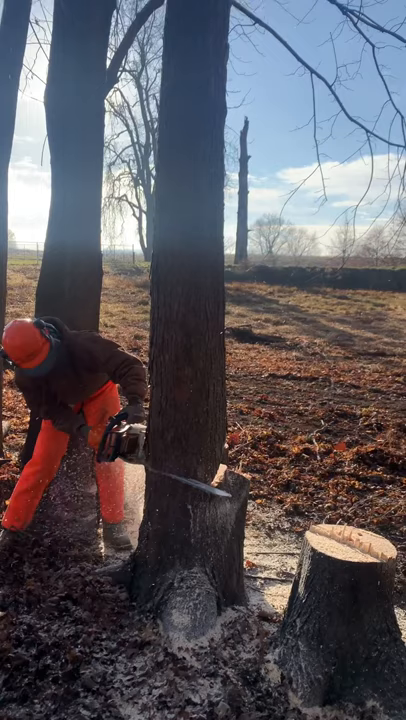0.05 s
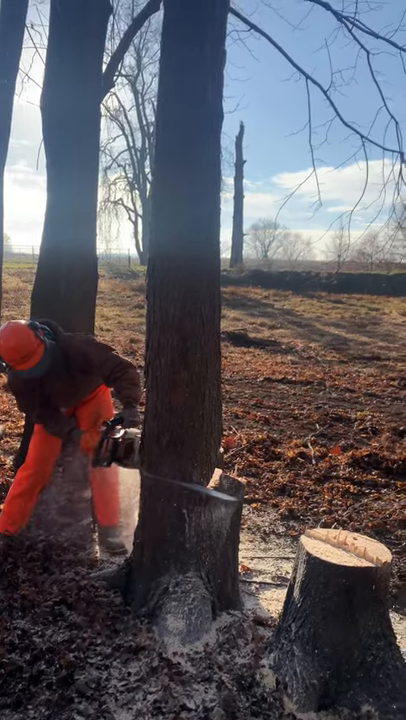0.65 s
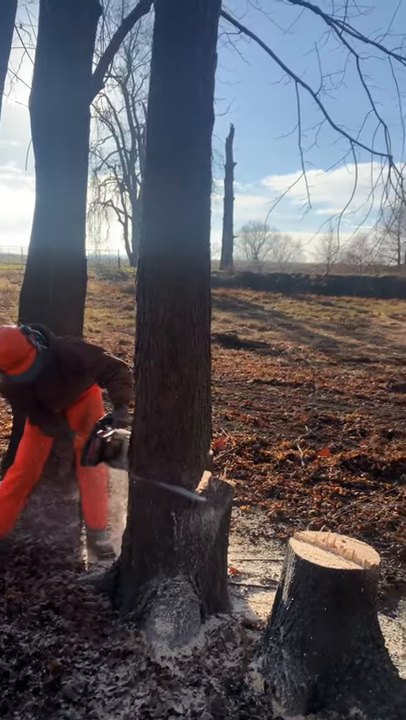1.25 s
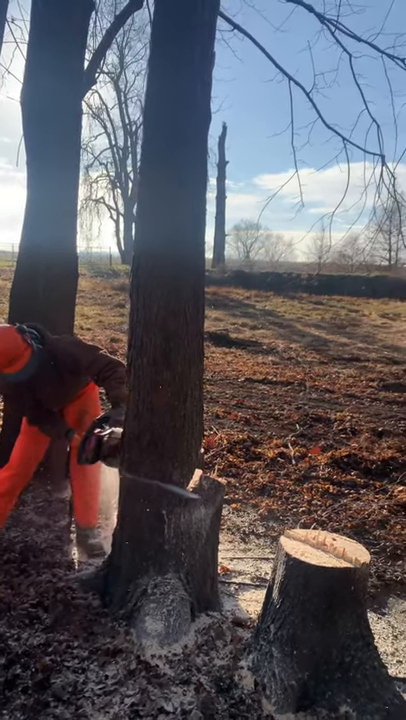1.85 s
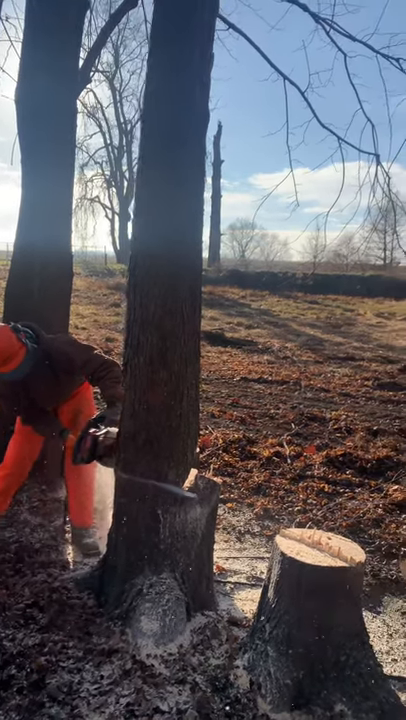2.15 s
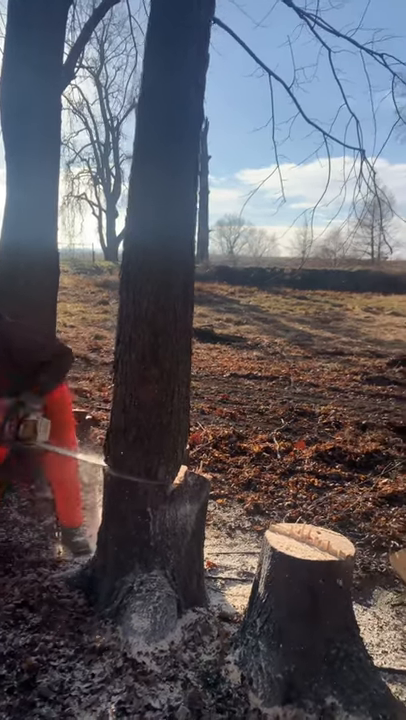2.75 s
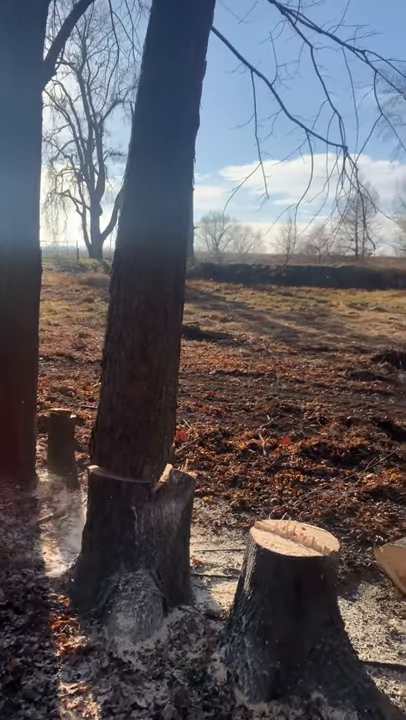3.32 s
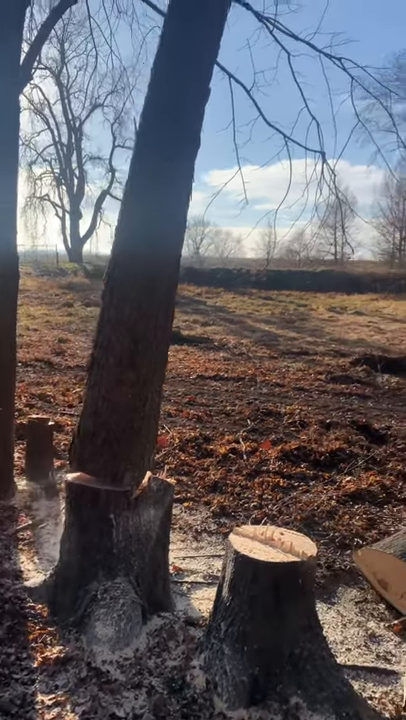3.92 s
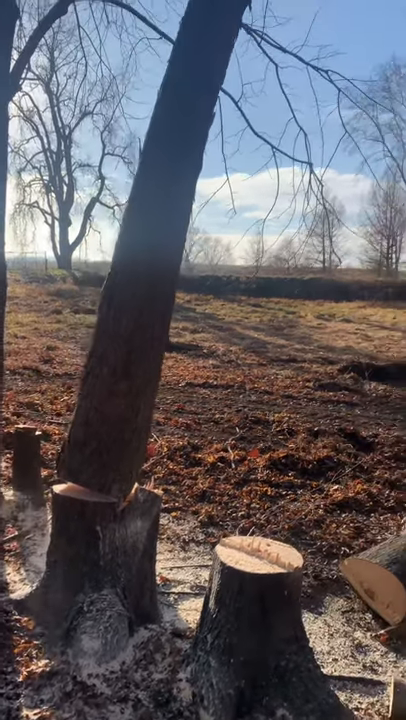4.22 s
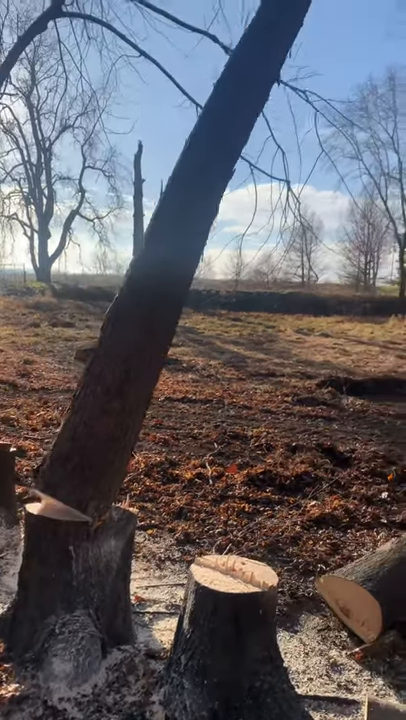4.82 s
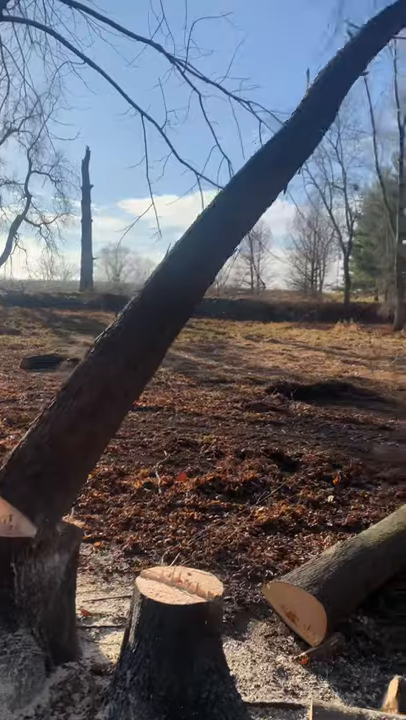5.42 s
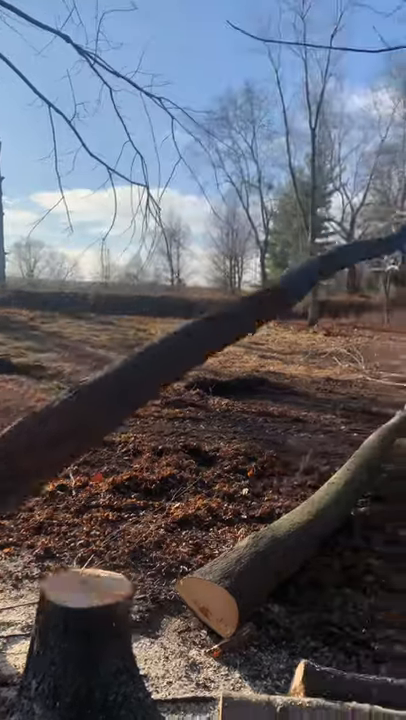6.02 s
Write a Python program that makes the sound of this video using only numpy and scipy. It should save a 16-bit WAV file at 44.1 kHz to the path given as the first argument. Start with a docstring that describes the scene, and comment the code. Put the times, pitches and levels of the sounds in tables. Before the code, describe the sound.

A chainsaw revs hard through a trunk outdoors, winds down to an uneven idle and moves off as wood fibres snap.

```python
"""A two-stroke chainsaw, close by, finishes a felling cut: full throttle, a short release, a second burst.
Each firing barks through the muffler and rings its shell while the chain hisses and whirrs on the bar.
The saw coasts down to a stumbling idle and is carried off as the tree tips and its hinge fibres snap.
Open field with a faint answer from the trees, heard near the stump by two close-set microphone ports."""
import sys
import numpy as np
from scipy import signal
from scipy.fft import rfft, irfft, next_fast_len
from scipy.io import wavfile
from scipy.ndimage import uniform_filter1d

SR = 44100
rng = np.random.default_rng(int(sys.argv[2]) if len(sys.argv) > 2 else 0)


def wav_record(signal):
    """Record a signal, one row per channel, as 16-bit PCM in the file named by sys.argv[1]."""
    frames = np.transpose(np.atleast_2d(signal))
    bounded = np.clip(frames, -1, 1)
    # unit amplitude maps onto the largest positive 16-bit level
    quanta = np.round(bounded * 32767).astype(np.int16)
    wavfile.write(sys.argv[1], SR, quanta)


N = 267687
TIME = np.arange(N) / SR

# Engine speed with the chain in the wood. Each row: time in seconds, turns a second.
FIRST_CUT_SPEED = [(.02, 148), (.21, 141.8), (.4, 145), (.5, 141.6), (.74, 141.4), (.82, 139.6)]
LAST_CUT_SPEED = [(1.34, 200.9), (1.648, 196.8), (1.708, 203.5), (1.826, 207.8), (2.082, 197.1),
                  (2.13, 188.2), (2.226, 193.9), (2.258, 192.9), (2.35, 182.6)]
# Throttle releases; wood brakes the chain harder than air does.
# Each row: start in seconds, time constant of the slowing in seconds.
THROTTLE_RELEASES = [(.82, 0.165), (2.35, .416)]
# The throttle between the cuts. Each row: time in seconds, share of a full charge.
THROTTLE_CHARGE = [(.826, 0.94), (.834, 0.29), (.93, 0.17), (.965, 0.69), (1.04, 0.99), (1.1, 0.93)]
# Ignition; off load the engine skips turns. Each row: start and end in seconds, turns per firing.
IGNITION_SPELLS = [(0, 1.921, 1), (1.926, 1.99, 1), (1.995, 2.064, 1), (2.064, 2.127, 3), (2.127, 2.261, 1),
                   (2.261, 2.305, 3), (2.305, 2.366, 4)]
# The stumbling idle. Each row: time of a firing in seconds, level at the stump in dB.
IDLE_FIRINGS = [(3.017, -29.5), (3.05, -27.5), (3.068, -23), (3.124, -22.5), (3.178, -24), (3.216, -22),
                (3.288, -20.5), (3.343, -26.5), (3.361, -21), (3.441, -24), (3.482, -26.5), (3.525, -21.5),
                (3.592, -20), (3.68, -20.5), (3.748, -23), (3.817, -20), (3.925, -21.5), (4.014, -20.5),
                (4.104, -21), (4.174, -19.5), (4.267, -17.5), (4.394, -20.5), (4.487, -20.5), (4.578, -24),
                (4.734, -20.5), (4.847, -22.5), (5.182, -24.5), (5.303, -20.5), (5.372, -24.5),
                (5.394, -24.5), (5.485, -23.5), (5.585, -24.5), (5.63, -24.5), (5.699, -22), (5.804, -22),
                (5.872, -24.5), (5.918, -24.5), (5.965, -23.5), (6.034, -19.5)]
# How far the swinging saw's outlet faces the microphone. Each row: time in seconds, gain in dB.
OUTLET_FACING = [(3.45, -6), (3.65, -23.5), (5.1, -24), (5.35, -10)]

# Tone colours of the exhaust. Each row: frequency in Hz, relative level in dB.
FIRED_MUFFLER = [(35, -76), (80, -2.5), (143, 1.5), (195, -10), (286, -3.5), (400, 4), (500, 5), (585, 13),
                 (715, 2.5), (830, 6.5), (990, 0.5), (1170, -4), (1330, -34), (1900, -34.5)]
UNFIRED_MUFFLER = [(40, -23), (90, 1.5), (160, 2.5), (220, 2.5), (360, 6), (480, 19), (620, 14),
                   (730, 15.5), (860, -4), (1300, -15), (2400, -41), (5000, -44)]
MUFFLER_SHELL = [(900, -3.5), (1400, 17.5), (1600, 5.5), (1790, 23.5), (1980, 13), (2350, 23), (2620, 23),
                 (2820, 8), (3020, 1.5), (3400, 20), (3650, 12), (4000, 14), (4400, -18), (4780, 6),
                 (5400, 9), (9000, -53)]
GAS_JET = [(100, -88), (600, -20), (1300, -15.5), (2400, -16.5), (4000, -20), (6000, -61)]
COAST_PUFF = [(60, -20), (180, -9), (290, 2), (420, 3.5), (560, 13), (700, -8), (850, -15), (1200, -27),
              (4000, -48)]
IDLE_BARK = [(120, -25), (260, -14), (340, -2), (530, -0.5), (620, -6.5), (790, -20), (1020, -15.5),
             (1450, -26.5), (6000, -33), (10000, -42.5)]
IDLE_PUFF = [(30, -4), (110, -22.5), (180, 5.5), (260, 5), (430, 9.5), (570, 5.5), (680, -14), (850, -27),
             (1200, -19), (5000, -32), (9000, -64)]
OUTLET_RING = [(450, -11.5), (700, 4), (880, 6.5), (1030, -2), (1230, -27), (1500, -29)]
BASS_THUMP = [(25, -78), (60, 9), (120, 12.5), (180, 11.5), (300, 2.5), (700, -48)]
SHARP_CLICK = [(300, -22), (1200, -3), (2200, 2), (3200, -2), (6000, -10), (12000, -4), (16000, -20)]
# Tone colours of the moving metal. Each row: frequency in Hz, relative level in dB.
CHAIN_HISS = [(3000, 0), (4600, 5), (5600, 2.5), (7200, 3), (8500, -3.5), (10000, 9), (12000, 8.5),
              (13500, 3.5), (15000, 3.5), (16000, -13)]
GUIDE_BAR = [(1400, 0), (2300, 3.5), (3200, 5), (3700, -1.5), (4300, -7)]
CLUTCH_CHATTER = [(1500, -36), (2000, -4.5), (2350, -3), (2800, -10), (6000, -26)]
PISTON_RATTLE = [(200, 10), (800, 11), (1500, -19.5), (2100, 0.5), (2650, -1), (3100, -3.5), (5500, -6.5),
                 (7000, -5.5), (8500, -7.5), (11000, -4), (16000, -27)]
# Whirr of the chain, driven and slack. Each row: multiple of the shaft speed, relative level in dB.
DRIVEN_WHIRR = [(14, -3), (16, 1), (17, -32), (21, 12), (23, 7.5)]
SLACK_WHIRR = [(14, -2), (15, 0), (16, -1), (22, -5)]
# Modes rung by links tapping the bar. Each row: frequency in Hz, level in dB, t60 in seconds.
LINK_MODES = [(2537, -45.5, 0.033), (2770, -48, 0.038), (3055, -45, 0.023), (4670, -55, 0.065)]

# Bundles of hinge fibres breaking. Each row: time in seconds, splinter level in dB, body level in dB.
HINGE_SNAPS = [(3.215, -38.5, -42), (3.455, -41, -56), (3.5475, -21, -20.5), (3.5526, -29.5, -31),
               (3.826, -21, -23.5), (3.9678, -34.5, -40.5), (4.0056, -39.5, -51), (4.0206, -38.5, -53),
               (4.055, -31.5, -36.5), (4.2247, -35, -46.5), (4.2983, -34, -36.5), (4.5297, -26, -25.5),
               (4.539, -36.0, -40), (4.5477, -30.5, -36), (4.603, -27, -35), (4.618, -36, -50),
               (4.6586, -35.5, -49), (4.8052, -33.5, -32.5), (4.816, -21, -19.5), (4.9038, -38, -46.5),
               (4.9714, -27, -26), (5.0017, -30.5, -30.5), (5.0615, -34, -40.5), (5.2147, -29.5, -28.5),
               (5.231, -35, -38), (5.263, -29, -34.5), (5.27, -28, -27.5), (5.278, -28, -27),
               (5.2799, -29.5, -42)]
# Tone colours of the breaking wood. Each row: frequency in Hz, relative level in dB.
SPLINTER_TREBLE = [(1500, -30), (5500, 0), (10500, 0), (13500, -5), (16000, -11)]
TRUNK_BODY = [(40, -45), (250, -13), (900, -4), (1800, 1), (3000, -4), (4300, -5), (6000, -16),
              (12000, -35)]

# The answer of ground and trees. Each row: frequency in Hz, t60 in seconds.
FIELD_DECAY = [(150, 0.3), (1500, 0.99), (5000, 0.071), (14000, 0.0039)]
# Hush of the open air. Each row: frequency in Hz, relative level in dB.
OPEN_AIR = [(20, -71), (70, -24), (400, -9), (1500, -25), (6000, -31), (16000, -49)]
# Left microphone port against right. Each row: frequency in Hz, phase difference in radians.
MIC_PHASE = [(0, 0), (750, -.6), (2670, -.3), (4650, -.8), (5250, -2.6), (6720, -.9), (8400, -3.1),
             (10700, -6.2), (13500, -9.4), (15200, -12.4)]
# The same two ports. Each row: frequency in Hz, level difference in dB.
MIC_BALANCE = [(160, -2.3), (400, 0), (740, -2.8), (2010, -.5), (5000, -3), (9000, 0)]

FULL_HZ, COAST_TO_HZ = 200, 25.15  # turns a second: flat out, and what a coasting engine sinks towards
REOPEN_S, PICKUP_S, RUN_UP_S = 0.94, .045, 0.34  # the throttle reopens, the engine hesitates, runs up
# Loudness follows speed. Each pair: gain in dB at full speed, dB per doubling of speed.
FIRED_LAW, UNFIRED_LAW = (-9.5, 2.3), (-17.5, 8.6)
RASP_LAW, RASP_COAST_LAW = (-26, 12), (-33, 8.9)
CHAIN_LAW, CHAIN_COAST_LAW = (-34, 2.7), (-38, 10.1)
IDLE_FROM_S, CATCH_HZ, IDLE_HZ, SETTLE_S = 3.12, 55, 43.84, .5  # the idle catches, then settles


def revving_saw():
    """The saw at the trunk, close up: one stroke a turn, fired or skipped, until the idle takes over."""
    rate = engine_speed()
    turns = np.cumsum(rate) / SR
    times = np.interp(np.arange(turns[-1]), turns, TIME)
    fired = np.zeros(len(times), bool)
    for start, end, every in IGNITION_SPELLS:
        spell = np.flatnonzero((times >= start) & (times < end))
        fired[spell[int(every) // 2::int(every)]] = True
    drift, size_scatter, edge_scatter = rng.standard_normal((len(times), 3)).T
    times = times + signal.lfilter([4e-6], [1, -.97], drift)  # the flywheel lets the timing only drift
    sizes = amp(.3 * size_scatter)
    edges = amp(.7 * edge_scatter - 11 * ~fired)  # the sharp opening of the exhaust port
    charge = fired * np.clip(curve(THROTTLE_CHARGE, times), 0, 1)
    load = np.interp(TIME, times, np.sqrt(signal.lfilter(np.ones(4) / 4, 1, charge ** 3)))
    gas = exhaust(times, sizes, fired, charge, rate) + coasting_puffs(times, sizes)
    treble = rasp(times, edges, load, rate, turns) + chain_hiss(times, edges, load, rate)
    fade = np.interp(TIME, [2.99, 3.04], [1, 0])
    return fade * (gas + treble) + clutch(times) + pops(times, fired)


def engine_speed():
    """Turns a second: set by the wood in each cut, sinking after a release, running up between cuts."""
    def coast(cut, at, start, tau):
        return COAST_TO_HZ + (curve(cut, TIME) - COAST_TO_HZ) * np.exp(-np.maximum(at - start, 0) / tau)
    first = coast(FIRST_CUT_SPEED, np.minimum(TIME, REOPEN_S), *THROTTLE_RELEASES[0])
    last = coast(LAST_CUT_SPEED, TIME, *THROTTLE_RELEASES[1])
    return last + (first - last) * np.clip(1 - (TIME - REOPEN_S - PICKUP_S) / RUN_UP_S, 0, 1) ** 2


def loudness(law, rate):
    """Gain at a given engine speed."""
    return amp(law[0] + law[1] * np.log2(rate / FULL_HZ))


def exhaust(times, sizes, fired, charge, rate, warm_up_s=0.31, heat_rise=0.061):
    """Fired charges bark, skipped turns pump softly; hotter gas lifts the bark in the second burst."""
    def strokes(law, share):
        return pulses(times, sizes * share * loudness(law, np.interp(times, TIME, rate)))
    heat = np.clip((times - REOPEN_S) / warm_up_s, 0, 1) ** 2
    hot_muffler = [(hz * (1 + heat_rise), db) for hz, db in FIRED_MUFFLER]
    bark = ring(strokes(FIRED_LAW, charge * (1 - heat)), FIRED_MUFFLER)
    bark += ring(strokes(FIRED_LAW, charge * heat), hot_muffler)
    churn = amp(-24) * loudness(UNFIRED_LAW, rate) * bursts(times, 1. * ~fired, t60=0.0092)
    pumping = ring(strokes(UNFIRED_LAW, 1 - charge) + churn, UNFIRED_MUFFLER)
    return baffle(bark + pumping)


def coasting_puffs(times, sizes, from_s=2.37, cooled_s=2.95, heat_rise=0.45):
    """Unfired strokes puff hollowly, lower as the gas cools, and come back off the trunk."""
    cooled = np.clip((times - from_s) / (cooled_s - from_s), 0, 1)
    sizes = sizes * (times > from_s)
    hot_puff = [(hz * (1 + heat_rise), db) for hz, db in COAST_PUFF]
    gas = ring(pulses(times, sizes * (1 - cooled) * amp(-43)), hot_puff)
    gas += ring(pulses(times, sizes * cooled * amp(-34)), COAST_PUFF)
    return baffle(trunk_echo(gas, delay_s=0.00619, share=0.86))


def baffle(x, hz=560, width_hz=420):
    """The muffler chamber delays the frequencies near its resonance and spreads each pulse."""
    resonance = lambda f: hz ** 2 - f ** 2 + 1j * f * width_hz
    return filtered(x, lambda f: np.conj(resonance(f)) / resonance(f))


def rasp(times, edges, load, rate, turns):
    """Each port opening rings the muffler shell and tears into turbulence, with the chain's whirr on top."""
    shell = even(ring(pulses(times, edges), MUFFLER_SHELL))
    jet = even(ring(bursts(times, edges, t60=0.93), GAS_JET))
    # the chain sings only once it bites, not while the engine runs up
    biting = np.where(TIME < REOPEN_S, 1, np.clip((TIME - REOPEN_S) / RUN_UP_S, 0, 1) ** 3)
    driven = biting * chain_whirr(turns, rate, DRIVEN_WHIRR, waver_db=2.5, slip_rad=1.0)
    slack = chain_whirr(turns, rate, SLACK_WHIRR, waver_db=5.5, slip_rad=2.6)
    loaded = loudness(RASP_LAW, rate) * (amp(-1) * shell + amp(-12) * jet + amp(-9) * driven)
    coasting = loudness(RASP_COAST_LAW, rate) * (amp(-11) * shell + amp(-7) * jet + amp(-6) * slack)
    return load * loaded + (1 - load) * coasting


def chain_whirr(turns, rate, partials, waver_db, slip_rad):
    """Chain and sprocket sing unsteadily at multiples of the shaft speed and fade as it slows."""
    drift = lambda: np.interp(np.arange(N), np.linspace(0, N, 320), rng.standard_normal(320))
    tones = sum(amp(db + waver_db * drift()) * np.sin(2 * np.pi * round(k) * turns + slip_rad * drift())
                for k, db in partials)
    return coloured(unit(tones), GUIDE_BAR) * np.minimum(rate / 150, 1) ** 2


def chain_hiss(times, edges, load, rate):
    """The running chain hisses in step with the strokes, louder under load."""
    hiss = even(ring(bursts(times, np.sqrt(edges), t60=0.041), CHAIN_HISS))
    return hiss * (load * loudness(CHAIN_LAW, rate) + (1 - load) * loudness(CHAIN_COAST_LAW, rate))


def clutch(times, grab_s=0.46):
    """Once the throttle reopens, the clutch chatters each turn, fading as it grips."""
    slipping = times[times > REOPEN_S]
    sizes = amp(-37.5) * np.exp((REOPEN_S - slipping) / grab_s)
    return ring(bursts(slipping, sizes, t60=0.037), CLUTCH_CHATTER)


def pops(times, fired):
    """A click and a low gulp as the throttle reopens, and a crack from each firing after a skipped turn."""
    click = ring(bursts(np.array([REOPEN_S + .004]), amp([-25]), t60=0.008), SHARP_CLICK)
    gulp = ring(pulses(np.array([REOPEN_S + .006]), amp([-31])), BASS_THUMP)
    crack_s = times[fired & ~np.append(True, fired[:-1])]
    cracks = ring(bursts(crack_s, np.full(len(crack_s), amp(-34)), t60=0.07), SHARP_CLICK)
    return click + gulp + cracks


def idling_saw(recharge_db=3, full_burn_db=-23):
    """The idle fires only every few turns; in between it puffs harder as the cylinder recharges."""
    def blow(s, db):
        """Gas churns out as the port opens, so no two blows are alike."""
        return pulses(s, amp(db)) + amp(-25) * bursts(s - .0015, amp(db), t60=0.033)
    fire_s, near_db = np.transpose(IDLE_FIRINGS)
    fire_db = near_db + away_db(fire_s)
    gaps = np.diff(fire_s)
    rate = IDLE_HZ + (CATCH_HZ - IDLE_HZ) * np.exp(-(fire_s[:-1] - IDLE_FROM_S) / SETTLE_S)
    recharge = [np.arange(1, n) / n for n in np.maximum(np.round(gaps * rate), 1)]
    puff_s = np.concatenate([s + gap * share for s, gap, share in zip(fire_s, gaps, recharge)])
    puff_db = -30.5 + 0.85 * away_db(puff_s) + recharge_db * (np.concatenate(recharge) - .5)
    gas = baffle(ring(blow(fire_s, fire_db), IDLE_BARK) + ring(blow(puff_s, puff_db), IDLE_PUFF))
    aimed = blow(fire_s, fire_db + curve(OUTLET_FACING, fire_s))
    aimed += blow(puff_s, puff_db + curve(OUTLET_FACING, puff_s))
    # weak charges hardly thump; the bass bends round obstacles and holds up as the saw moves off
    thumps = pulses(fire_s, amp(-36 + 5.3 * np.minimum(near_db - full_burn_db, 0)))
    thumps += pulses(puff_s, np.full(len(puff_s), amp(-47)))
    gas += ring(aimed, OUTLET_RING) + ring(thumps, BASS_THUMP)
    gas = baffle(gas, hz=125, width_hz=49)  # the bass leaves the muffler last
    return trunk_echo(gas, delay_s=0.00563, share=0.14) + piston_rattle(fire_s, puff_s)


def piston_rattle(fire_s, puff_s, shade_hz=5000):
    """The piston rattles each idle turn, harder on a firing; the trunks shade its highest part most."""
    spit = ring(bursts(fire_s, amp(-49 + 0.24 * away_db(fire_s)), t60=0.11), PISTON_RATTLE)
    strokes = np.concatenate([fire_s, puff_s])
    rattle = even(ring(bursts(strokes, np.ones(len(strokes)), t60=0.085), PISTON_RATTLE))
    metal = spit + amp(-49) * rattle
    dull = filtered(metal, lambda hz: 1 / (1 + (hz / shade_hz) ** 2))
    shade = amp(shade_db(TIME))
    return shade * dull + shade ** 2.8 * (metal - dull)


def slack_links(count=240, slack_s=2.2):
    """Slack links tap the guide bar at random; each tap rings its modes in a different mix."""
    chance = rng.random((count, 1 + len(LINK_MODES)))
    tap_s = slack_s + (np.arange(count) + chance[:, 0]) / count * (N / SR - slack_s)
    sizes = amp(away_db(tap_s) + shade_db(tap_s))[:, None] * 2 * chance[:, 1:] ** 2
    t = np.arange(SR // 10) / SR
    modes = [amp(db - 60 * t / t60) * np.sin(2 * np.pi * hz * t) for hz, db, t60 in LINK_MODES]
    return sum(signal.fftconvolve(pulses(tap_s, size), mode)[:N] for size, mode in zip(sizes.T, modes))


def away_db(s):
    """Level lost as the saw is carried away from the microphone."""
    return np.interp(s, [4.68, 4.87], [0, -10])


def shade_db(s, from_s=5.25, db_per_s=16):
    """Treble lost as the saw goes behind the trunks."""
    return -db_per_s * np.maximum(s - from_s, 0)


def hinge_snaps(split_hz=2200, ring_db=4, ring_octaves=0.16):
    """Big bundles of fibres snap at the stump, each split piece with its own ring."""
    snaps, hz = np.zeros((2, N + SR)), np.geomspace(40, 16000, 70)
    for s, splinter_db, body_db in HINGE_SNAPS:
        ring_hz = split_hz * 2 ** rng.uniform(-0.32, 0.86)
        piece_db = along(TRUNK_BODY, hz) + ring_db * np.exp(-(np.log2(hz / ring_hz) / ring_octaves) ** 2)
        treble = fracture(SPLINTER_TREBLE, lead_db=-21, tear=(-18, 0.0052),
                          tail=(-30.5, 0.089), width=0.53)
        body = fracture(np.transpose([hz, piece_db]), lead_db=-15.5, tear=(-17, 0.0096),
                        tail=(-28.5, 0.084), width=0.92)
        start = round(s * SR) - SR // 100
        snaps[:, start:start + body.shape[1]] += amp(splinter_db) * treble + amp(body_db) * body
    return snaps[:, :N]


def fracture(colour, lead_db, tear, tail, width):
    """Wood gives, lets go in one spike, tears on and shivers. Tear and tail: dB, t60 in seconds."""
    lead, size = 132, SR // 7
    t, hz = (np.arange(size) - lead) / SR, np.geomspace(40, 16000, 70)
    dying = lambda db, t60: amp(db) * 1e-3 ** (np.abs(t) / t60)
    envelope = np.where(t < 0, dying(lead_db, 0.0057), dying(*tear) + dying(*tail))
    splinters = np.repeat(rng.uniform(.3, 1.5, size // 12 + 1), 12)[:size]
    shared, own = rng.standard_normal(size), rng.standard_normal((2, size))
    force = (t == 0) + envelope * splinters * (shared + width * own)
    grain = np.transpose([hz, along(colour, hz) + 2 * rng.standard_normal(len(hz))])
    sound = np.array([ring(side, grain) for side in force])[:, :size]
    sound /= np.sqrt(np.mean(sound[:, lead - 44:lead + 397] ** 2))  # rms 1 over the 10 ms of the crack
    return np.pad(sound, ((0, 0), (SR // 100 - lead, 0)))  # the spike lies 10 ms in


def hinge_crackle(count=60, from_s=2.9, until_s=4, rise_db_per_s=10, spread_db=17):
    """Small fibres break as the tree starts to tip, louder as the strain grows."""
    jitter, strength = rng.random((count, 2)).T
    break_s = from_s + (np.arange(count) + jitter) / count * (until_s - from_s)
    sizes = amp(-45 + rise_db_per_s * (break_s - from_s) + spread_db * strength ** 3)
    fibres = pulses(break_s, sizes) + amp(-17) * bursts(break_s, sizes, t60=0.033)
    return ring(fibres, SPLINTER_TREBLE) + amp(-20) * ring(fibres, TRUNK_BODY)


def trunk_echo(x, delay_s, share):
    """The direct sound plus one reflection off a nearby trunk."""
    return x + share * filtered(x, lambda hz: np.exp(-2j * np.pi * hz * delay_s))


def field_answer(x):
    """Ground and trees scatter the sound back, differently at each microphone port."""
    hz, t, spectrum = signal.stft(rng.standard_normal((2, SR // 2)), SR, nperseg=256)
    decay = amp(-60 * t / along(FIELD_DECAY, hz)[:, None])
    tail = signal.istft(spectrum * decay, SR, nperseg=256)[1]
    return signal.fftconvolve(x[None], tail / np.linalg.norm(tail[0]), axes=1)[:, :N]


def open_air():
    """A faint hush over the field, mostly common to both ports."""
    hush = lambda: unit(coloured(rng.standard_normal(N), OPEN_AIR))
    return amp(-60) * hush() + amp(-67) * np.array([hush(), hush()])


def microphone(x):
    """The two ports hear the direct sound a little apart in phase and level."""
    half = lambda hz: amp(along(MIC_BALANCE, hz) / 2) * np.exp(.5j * along(MIC_PHASE, hz))
    return filtered(x, lambda hz: np.array([half(hz), 1 / half(hz)]))


def amp(db):
    """Decibels to gain."""
    return 10 ** (np.asarray(db) / 20)


def unit(x):
    """Scale to rms 1."""
    return x / np.sqrt(np.mean(x ** 2) + 1e-20)


def even(x, size=1400):
    """Hold the running rms at 1, keeping the single pulses."""
    return x / np.sqrt(np.abs(uniform_filter1d(uniform_filter1d(x ** 2, size), size)) + 1e-9)


def along(points, hz):
    """Read (Hz, value) points on a log axis."""
    f, v = np.transpose(points)
    return np.interp(np.log(hz + 1), np.log(f + 1), v)


def curve(points, s):
    """Read (seconds, value) points at given times."""
    return np.interp(s, *np.transpose(points))


def filtered(x, response):
    """x times a response of frequency."""
    m = next_fast_len(N + SR // 2)
    return irfft(rfft(x, m) * response(np.fft.rfftfreq(m, 1 / SR)), m)[..., :N]


def coloured(x, colour):
    """x shaped by (Hz, dB) points."""
    return filtered(x, lambda hz: amp(along(colour, hz)))


def ring(x, colour, size=4096):
    """x through a causal body whose answer to a unit blow peaks at 1."""
    cepstrum = irfft(np.log(amp(along(colour, np.fft.rfftfreq(size, 1 / SR)))))
    answer = irfft(np.exp(rfft(2 * cepstrum[:size // 2], size) - cepstrum[0]))
    return signal.fftconvolve(x, answer / np.abs(answer).max())[:N]


def pulses(times, sizes):
    """Blows placed between samples."""
    taps = np.floor(times * SR)[:, None] + np.arange(-7, 9)
    off = taps - times[:, None] * SR
    shape = np.sinc(off) * np.sinc(off / 8) * sizes[:, None]
    return np.bincount(np.clip(taps, 0, N).astype(int).ravel(), shape.ravel(), N + 1)[:N]


def bursts(times, sizes, t60):
    """White noise that flares at each blow and dies away."""
    power = np.bincount(np.clip(times * SR, 0, N).astype(int), sizes ** 2, N + 1)[:N]
    fall = 10 ** (-6 / (t60 * SR))
    return np.sqrt(signal.lfilter([1], [1, -fall], power)) * rng.standard_normal(N)


def scene():
    """Saw and tree close to the microphone, the open field behind them."""
    saw = revving_saw()
    idle = idling_saw() + slack_links()
    wood = hinge_snaps() + hinge_crackle()
    air = open_air()
    # bark and leaves scatter the treble more than the bass
    scattered = coloured(saw, [(800, -26), (3000, -18), (6000, -7)])
    answer = field_answer(scattered + amp(-14.5) * idle + amp(-25.5) * wood.mean(axis=0))
    return microphone(saw + idle + wood) + answer + air


def record(dry, low_hz=38, top_hz=16200):
    """The recorder clips at full scale, rolls off the deepest bass and stops at its band limit."""
    band = lambda hz: hz ** 3 / np.hypot(hz ** 3, low_hz ** 3) * (hz < top_hz)
    return filtered(np.clip(dry, -1, 1), band)


dry = scene()
out = record(dry)
wav_record(out)
```